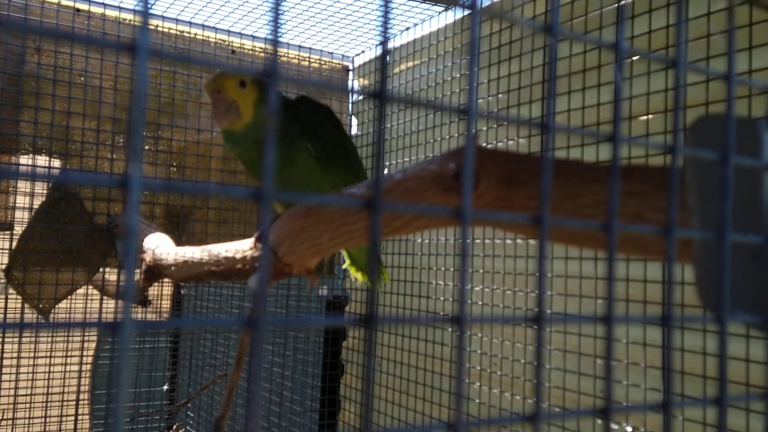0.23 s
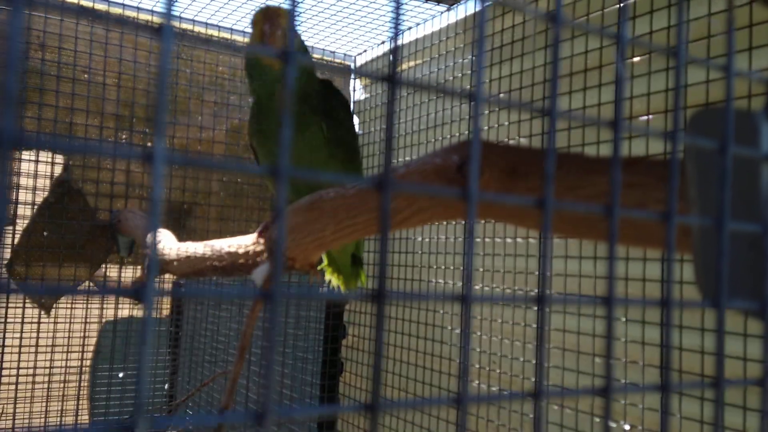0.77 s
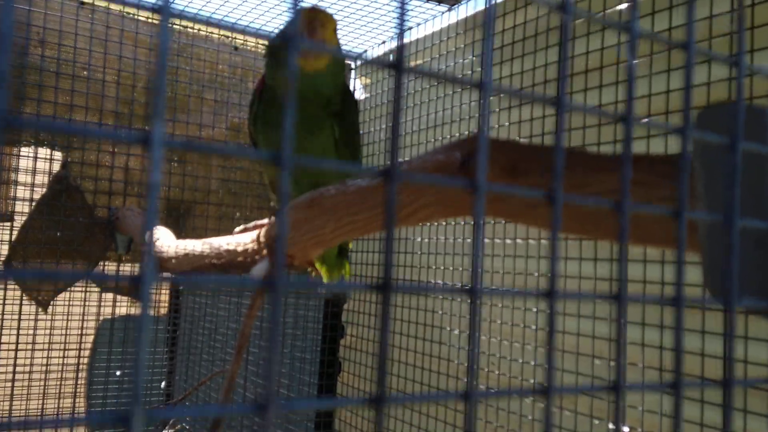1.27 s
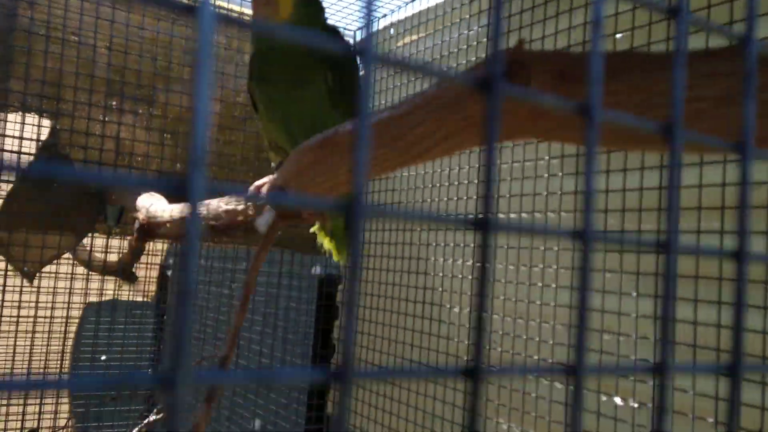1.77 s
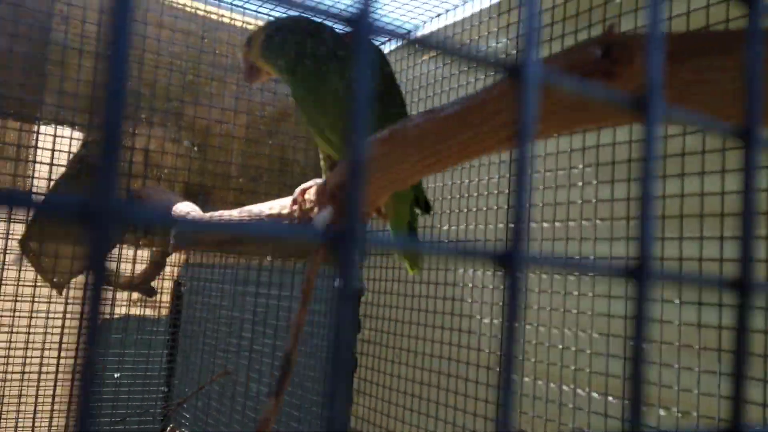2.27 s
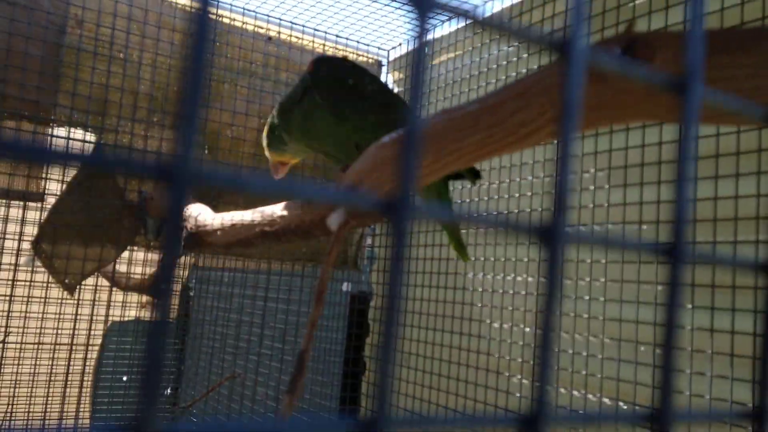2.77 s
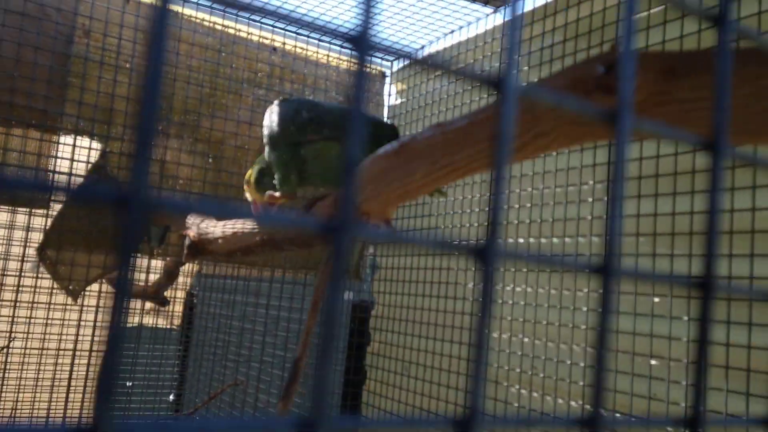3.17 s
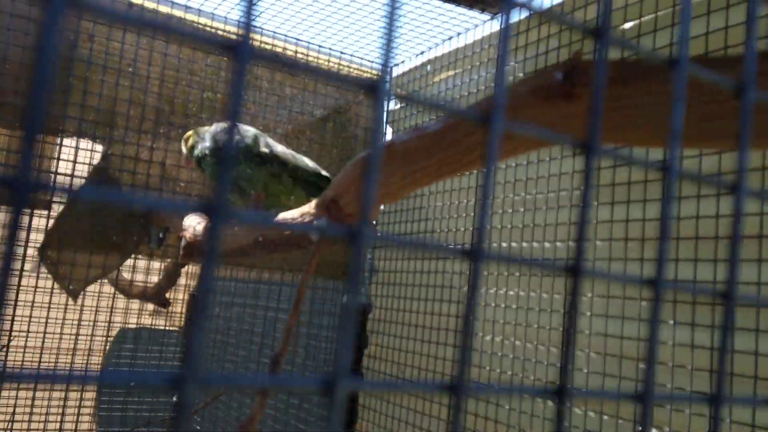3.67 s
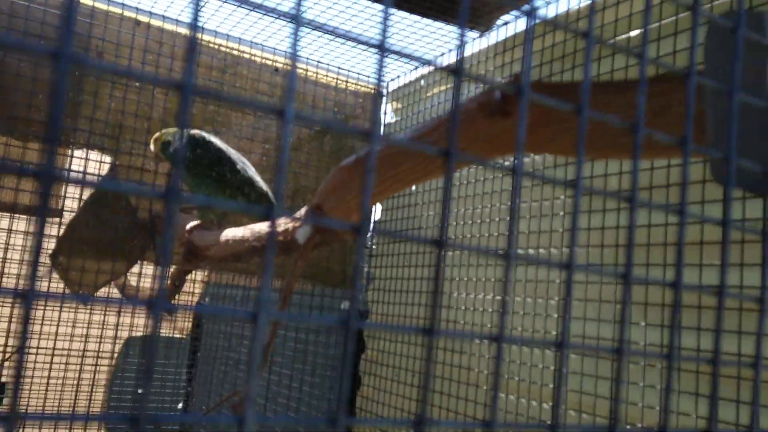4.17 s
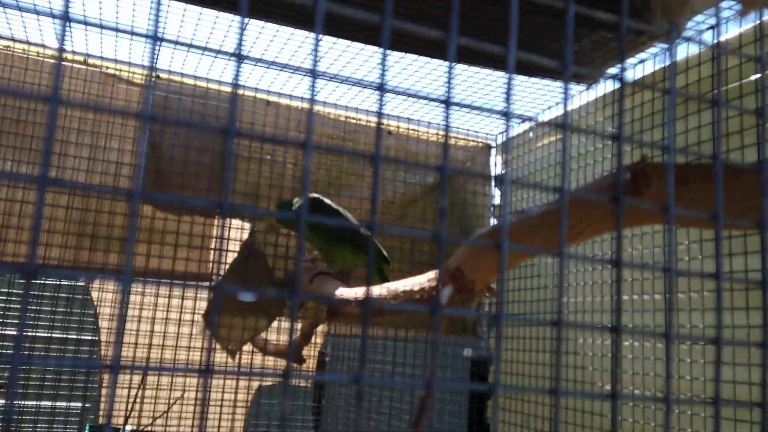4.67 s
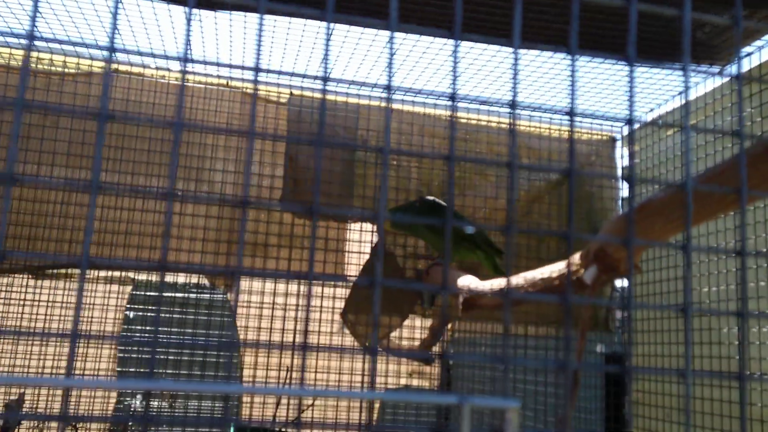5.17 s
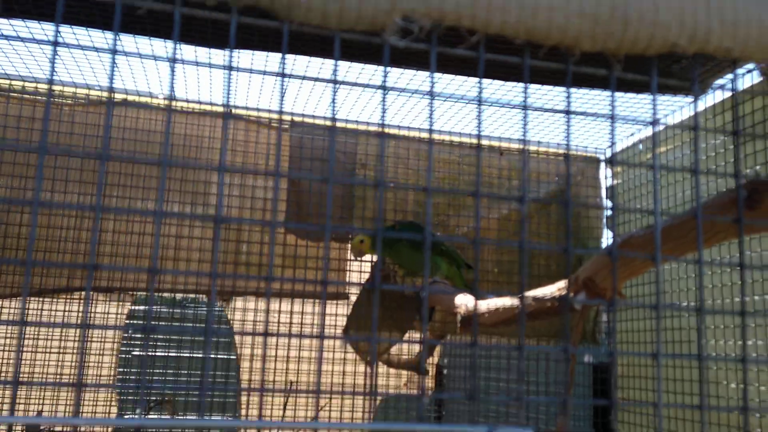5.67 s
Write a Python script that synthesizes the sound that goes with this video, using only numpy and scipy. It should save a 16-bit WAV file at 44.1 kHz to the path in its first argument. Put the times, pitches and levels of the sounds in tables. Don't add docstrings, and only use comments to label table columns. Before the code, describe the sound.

A parrot close by gnaws a wooden perch with sharp irregular cracks, dry ticks and short scrapes, then stops, leaving faint rustling and a feather shake.

```python
import sys
import numpy as np
from scipy import signal
from scipy.fft import rfft, irfft, next_fast_len
from scipy.io import wavfile
from scipy.ndimage import uniform_filter1d

SR = 44100
rng = np.random.default_rng(int(sys.argv[2]) if len(sys.argv) > 2 else 0)


def decibels_to_gain(level_db):
    exponent = np.asarray(level_db, float) / 20
    return 10 ** exponent


def generate_wav(signal):
    frames = np.transpose(np.atleast_2d(signal))
    scaled = np.clip(frames, -1, 1) * 32767
    pcm = np.round(scaled).astype(np.int16)
    wavfile.write(sys.argv[1], SR, pcm)


N = 260631
SPACING = 21
TURN_S = 2.0

# time in seconds, tick peak in dB, wood knock peak in dB,
# chip pitch in Hz, lead of the first touch in seconds.
SNAPS = [
    (0.2596, -26, -14, 2440, 0.009),
    (0.6299, -32.5, -25, 2570, 0.00086),
    (1.016, -19.5, -16.5, 2300, 0.009),
    (1.389, -16, -19, 2340, 0.00089),
    (1.787, -9, -7, 2470, 0.0096),
    (2.1838, -16, -8.5, 2880, 0.0067),
    (2.581, -10, -8, 2300, 0.0095),
    (2.9909, -21, -7, 2560, 0.0087),
    (3.4074, -11.5, -5.5, 2300, 0.012),
    (3.808, -8.5, -5.5, 1966, 0.0086),
]
# low thump in dB, high ring in dB.
HOLDS = [
    (-10.5, -4.5),
    (1.5, -3),
    (-3, 0.5),
    (-1, -5),
    (-3.5, -9),
    (-5, -1),
    (-1.5, 0.5),
    (-1, -1.5),
    (1.5, -5),
    (-2, -7.5),
]
# time in seconds, tick peak in dB, knock peak in dB, chip pitch in Hz.
KNOCKS = [(0.1655, -72, -43.5, 2730), (0.2157, -63, -40.5, 2780), (0.4336, -46, -36.5, 4950),
          (0.669, -18, -27, 3540), (.6705, -34, -35, 4800), (0.922, -61, -42, 3620),
          (2.277, -40, -27, 1980), (1.899, -25, -36, 2390), (0.544, -58, -46, 2600),
          (0.557, -50, -43, 3200), (0.6523, -60, -48, 2330), (0.193, -62, -58, 2250),
          (2.9298, -48, -30, 2300), (3.7319, -58.5, -42, 2400), (2.05, -23.5, -34, 3800),
          (2.091, -41, -34, 2130), (2.421, -20, -33.5, 3600), (2.484, -41, -32, 2300),
          (2.534, -45, -30, 2960), (2.8826, -51, -37, 2020), (2.999, -16.5, -20.5, 2520),
          (3.115, -28, -29.5, 2300), (3.245, -20.5, -27, 2300), (3.328, -34.5, -23, 1970),
          (3.5022, -20.5, -27, 2280), (3.6396, -19, -33.5, 3800), (3.6912, -38.5, -32.5, 2290),
          (3.694, -60, -30, 3100), (3.7546, -13, -17.5, 2600), (3.7714, -19, -26, 3400),
          (3.7964, -29, -49, 2400), (4.0822, -28, -39.5, 3700), (4.1172, -26.5, -37.5, 2400),
          (3.7997, -35, -28, 2390), (3.71, -55, -44, 2300), (4.1276, -29, -37, 2370),
          (4.1346, -42, -40, 2480), (4.14, -33, -41, 2410), (4.1858, -58, -42, 2720),
          (4.432, -43, -45, 2960), (4.9923, -44, -46, 2540)]
# time in seconds, peak in dB.
DRY_TICKS = [(.1016, -53), (.1273, -42), (.1306, -30.5), (.134, -36), (.4935, -46), (.5066, -35.5),
             (.5077, -23.5), (.5095, -21), (.5178, -38), (.5212, -37), (.5243, -29), (.5271, -37),
             (.5299, -50), (1.6178, -34), (2.0302, -19), (2.055, -26.5), (2.0587, -26), (2.1425, -38),
             (2.2018, -26), (2.2105, -40), (2.2148, -42), (2.2982, -28), (2.316, -46), (2.4228, -24),
             (2.4472, -19.5), (2.4525, -25), (2.4569, -23), (2.4609, -38), (2.541, -39), (2.5754, -45),
             (2.6047, -30), (2.6205, -32), (2.7226, -33), (2.8257, -18.5), (2.849, -27), (2.8537, -19),
             (2.8575, -37), (2.9863, -21), (3.222, -19.5), (3.2392, -23), (3.2496, -29), (3.2537, -25),
             (3.3907, -50), (3.6586, -18.5), (3.663, -19), (3.6673, -24.5), (3.6709, -49), (3.674, -27),
             (3.7576, -22), (3.8235, -28)]
# time in seconds, peak in dB.
GRIPS = [
    (0.2854, -19.5),
    (1.0455, -17.5),
    (1.4314, -20),
    (1.8195, -23),
    (2.2202, -19),
    (2.617, -21),
    (3.0156, -20),
    (3.8345, -21),
]
# time in seconds, peak in dB.
PINGS = [
    (.1132, -23.5),
    (0.8704, -19.5),
    (1.2461, -20),
    (1.6148, -14),
    (3.7545, -20),
]
# time in seconds, peak in dB.
FAR_TICKS = [(1.2965, -37), (1.2994, -34), (1.635, -28), (1.6638, -20.5), (2.7826, -41), (4.2988, -56),
             (4.3236, -40), (4.4441, -37), (4.73, -58), (5.34, -60.5), (5.7722, -53)]
# pitch in Hz, level in dB, 60 dB decay in seconds.
PERCH_MODES = [(263, -28.5, 0.055), (1076, -17, 0.013), (1426, -9, 0.0064), (2132, -4.5, 0.007),
               (3385, -15.5, 0.011), (4150, -12.5, 0.012), (4970, -12.5, 0.014), (6737, -11, 0.0067)]
# frequency in Hz, level in dB.
WOOD_TICK = [(1500, -39), (3000, -18), (4000, -10.5), (5600, -7), (7000, 1), (10000, 0.5), (14000, -11),
             (16500, -19)]
# frequency in Hz, level in dB.
HORN = [(1500, -56.5), (3000, -20), (4500, -7), (6000, -11.5), (7500, -1), (9500, 0), (12000, -9.5),
        (16500, -32)]
# frequency in Hz, level in dB.
PING = [(2500, -40), (4000, -17), (5800, -26), (7500, -6), (9500, 0), (11000, -5), (13000, -26),
        (16500, -28)]
# frequency in Hz, share of left-right dB.
SHADE_FACING = [(1000, 0.15), (2000, 0.18), (2800, 1), (4500, 0.74), (6500, 0.51), (9000, 1), (14000, 0.73)]
# frequency in Hz, share of left-right dB.
SHADE_TURNED = [(1000, .5), (2000, 0.57), (2800, 1.5), (4500, 0.9), (6500, .55), (9000, 1.5), (14000, 2.5)]
# bite in seconds, full pressure in seconds, lift in seconds,
# hiss in dB, rumble through the perch in dB.
RASPS = [
    (0.298, 0.327, 0.35, -31.5, -60),
    (0.678, 0.714, 0.72, -30, -57.5),
    (1.058, 1.086, 1.112, -32, -55.5),
    (1.446, 1.468, 1.515, -31.5, -60),
    (1.837, 1.856, 1.894, -26.5, -50),
    (2.234, 2.26, 2.296, -27, -49.5),
    (2.628, 2.66, 2.692, -29, -50),
    (3.031, 3.07, 3.086, -21.5, -41),
    (3.446, 3.486, 3.496, -24, -40.5),
    (3.846, 3.876, 3.89, -26, -45.5),
]
# frequency in Hz, level in dB.
GRAIN = [(800, -29.5), (1500, -22.5), (2200, -11.5), (3700, -13), (5600, -14), (6400, -4), (10000, 1.5),
         (12500, -6.5), (16000, -15.5)]
# frequency in Hz, level in dB.
TURNED_GRAIN = [(6000, 0), (9000, -2), (12000, 2.5), (16000, -0.5)]
# frequency in Hz, level in dB.
RUMBLE = [(45, -46), (68, -7), (130, -14.5), (300, -6.5), (900, -7.5), (1500, -13.5), (3000, -20.5)]
# frequency in Hz, level in dB.
FAR_EAR = [(200, -7.5), (1000, -8), (2500, -5.5), (4500, -14.5), (9000, -13.5), (15000, -65)]
# time in seconds, pitch in Hz, peak in dB, length in seconds.
BUMPS = [(1.385, 334, -40, 0.014), (1.412, 227, -40.5, 0.016), (1.488, 253, -31, 0.013),
         (1.512, 268, -42, 0.015), (1.547, 205, -39.5, 0.019), (2.696, 462, -45.5, 0.035),
         (2.783, 453, -50, 0.029), (2.811, 438, -36, 0.021), (2.814, 956, -43.5, 0.02),
         (2.828, 380, -37, .012), (2.84, 418, -37.5, 0.01)]
# peak time in seconds, peak in dB, rise in seconds, fall in seconds.
DRAGS = [
    (1.68, -40, 0.038, 0.22),
    (1.76, -43, 0.14, 0.031),
    (3.29, -43, 0.051, 0.15),
]
# frequency in Hz, level in dB.
CLAW = [(1000, -26), (1800, -6), (2500, -0.5), (2900, 0), (3300, -12), (4000, -30)]
# frequency in Hz, level in dB.
PLUMES = [(1500, -20), (3000, -10), (4500, -17), (6000, -5), (7000, -6.5), (8500, 4.5), (12500, -9),
          (13600, -18), (16000, -22)]
# time in seconds, peak in dB, left-right in dB.
CRACKS = [
    (1.546, -20, 3),
    (1.55, -8, 0.5),
    (1.5563, -17.5, 8),
]
# frequency in Hz, level in dB.
TWIG = [(1500, -17), (3000, -14), (5500, -41), (7000, -3), (9500, 6.5), (12000, -10), (16000, -18)]
# frequency in Hz, level in dB.
HOUSING = [(150, -11.5), (500, -1.5), (1000, 1.5), (3000, -5.5), (9000, -8), (15000, -30)]
# start in seconds, length in seconds, pitch in Hz, glide in Hz, level in dB.
CHIRPS = [(0.014, .052, 5740, 20, -75), (4.56, 0.075, 6230, 170, -79.5), (0, 0.013, 3580, 0, -68.5),
          (.006, .054, 2910, -70, -70), (.052, .052, 2930, 50, -67), (3.522, .028, 3400, 20, -71),
          (3.558, .062, 3470, 20, -73), (4.5, .11, 3830, 60, -76), (4.51, .03, 3660, -30, -76),
          (4.605, .035, 3000, -200, -77), (4.64, .16, 3150, -60, -84)]
# time in seconds, level in dB.
STIR = [(0, -62), (.9, -63), (1.2, -57.5), (1.52, -40.5), (1.62, -51), (1.83, -45), (2.0, -57.5),
        (2.24, -56), (2.4, -58.5), (2.85, -51), (3.02, -44.5), (3.12, -54), (3.38, -40.5), (3.57, -54.5),
        (3.735, -53), (3.84, -47.5), (4.05, -55), (5.91, -64)]
# peak time in seconds, peak in dB, rise in seconds, fall in seconds.
RUSTLES = [(.37, -52, 0.21, 0.13), (.76, -51, 0.15, 0.054), (1.1, -43, 0.1, 0.036), (1.5, -39, 0.45, 0.075),
           (1.57, -44, 0.047, 0.054), (1.69, -34.5, 0.078, 0.11), (1.83, -45.5, 0.25, 0.12),
           (2.22, -52, 0.11, 0.16), (2.44, -45, 0.06, 0.062), (2.7, -41.5, 0.04, 0.091),
           (2.836, -42, 0.08, 0.13), (3.02, -50, 0.099, 0.6), (3.3, -44.5, 0.055, 0.042),
           (3.905, -43, 0.1, 0.13), (4.1, -57.5, 0.053, 0.11), (4.36, -65.5, 0.13, 0.34),
           (5.01, -59.5, 0.26, 0.082), (5.15, -60, 0.02, 0.23)]
# peak time in seconds, peak in dB, rise in seconds, fall in seconds.
SCUFFLES = [
    (.29, -58.5, 0.028, 0.34),
    (.7, -61, 0.051, 0.35),
    (1.56, -73, 0.06, 0.049),
    (1.68, -41, 0.016, 0.14),
    (2.44, -51, 0.091, 0.14),
    (2.86, -49.5, 0.17, 0.39),
    (3.03, -50, 0.077, 0.68),
    (3.3, -34.5, 0.39, 0.23),
    (3.834, -44.5, 0.063, 0.15),
    (5.45, -54, 0.015, 0.2),
]
# frequency in Hz, level in dB.
FINE = [(1500, -26.5), (3500, -6.5), (5400, -5.5), (6500, -1), (8500, 3.5), (10500, -5), (13000, -15.5),
        (16000, -29.5)]
# frequency in Hz, level in dB.
COARSE = [(500, -9.5), (1000, 0.5), (2000, 3), (2800, -1.5), (3200, -6.5), (3800, -17), (5500, -15.5),
          (9000, -44.5)]
# frequency in Hz, level in dB.
WASH = [(60, -4), (160, -4), (220, -1.5), (450, -2.5), (680, 0), (1000, -4.5), (1500, -31.5), (2500, -39)]
# frequency in Hz, left-right likeness.
SAME = [(290, .72), (640, .05), (1400, -.25), (3100, -.08), (8000, .02)]
# frequency in Hz, left-right in dB.
LEAN = [(300, 3), (2000, -2.5), (4500, 4), (6300, -4.5), (9000, -1), (12000, 7)]
# time in seconds, level in dB.
DRONE = [
    (0.0, -71.5),
    (1.33, -70),
    (1.51, -65.5),
    (2.76, -71.5),
    (3.21, -62),
    (5.91, -75),
]
# frequency in Hz, level in dB.
BASS = [(20, -41.5), (40, -32), (62, 6.5), (80, 1.5), (100, 1.5), (125, 2.5), (200, -27)]
# frequency in Hz, level in dB.
MIC = [(15, -40), (45, -3), (80, 0), (15800, 0), (16050, -26), (16750, -30), (16850, -90)]


def contacts():
    rows = []
    for (s, tick_db, knock_db, chip_hz, lead), hold in zip(SNAPS, HOLDS):
        rows.append((s, tick_db, knock_db, chip_hz, 18, WOOD_TICK, *hold))
        rows.append((s - lead, knock_db - 26, knock_db - 15, 2980, 10, WOOD_TICK, -3, -6))
    for knock in KNOCKS:
        rows.append((*knock, 18, WOOD_TICK, 0, 0))
    dry_contacts = [(PINGS, 17.5, PING), (DRY_TICKS, 17.5, HORN), (GRIPS, 17.5, HORN), (FAR_TICKS, 7, HORN)]
    for events, pan_db, colour in dry_contacts:
        for s, db in events:
            rows.append((s, db, db - 30.5, 2300, pan_db, colour, 0, 0))
    return rows


def bites():
    out, t = np.zeros((2, N)), np.arange(2400) / SR
    for s, tick_db, knock_db, chip_hz, pan_db, colour, thump_db, ring_db in contacts():
        tick_t60 = 0.012 if colour is PING else 0.0015
        bite = peaked(beak_tick(t, colour, tick_t60), tick_db)
        knock = wood_knock(t, knock_db, chip_hz, thump_db, ring_db)
        add(bite, 0.0008, peaked(knock, knock_db))
        lag = np.clip(pan_db / 8, -1, 1) * SPACING / SR / 2
        shade = SHADE_FACING if s < TURN_S else SHADE_TURNED
        for ear, side in enumerate((1, -1)):
            away_db = min(side * pan_db, 0)
            shaded = coloured(bite, [(hz, away_db * share) for hz, share in shade])
            add(out[ear], s + abs(lag) - side * lag, shaded)
    return out


def beak_tick(t, colour, t60):
    decay = decibels_to_gain(-60 * t / t60) + decibels_to_gain(-15 - 60 * t / 0.014)
    return swept(coloured(rng.standard_normal(len(t)) * decay, colour))


def swept(x):
    hz = np.fft.rfftfreq(len(x), 1 / SR)
    late = 0.002 * (4000 / np.maximum(hz, 3500)) ** 2.4
    phase = 2 * np.pi * np.cumsum(late) * hz[1]
    return irfft(rfft(x) * np.exp(-1j * phase), len(x))


def wood_knock(t, knock_db, chip_hz, thump_db, ring_db):
    hz, db, t60 = np.array(PERCH_MODES).T[:, :, None]
    level_spread, pitch_spread = rng.standard_normal((2, len(PERCH_MODES), 1))
    hold_db = thump_db * (hz < 500) + ring_db * ((hz > 3000) & (hz < 5800))
    decay = decibels_to_gain(db + hold_db + 1.5 * level_spread - 60 * t / t60)
    perch = decay * np.sin(2 * np.pi * hz * (1 + 0.025 * pitch_spread) * t)
    reach_db = np.clip(0.23 * (knock_db - 2.0), -14, 0)
    chip = decibels_to_gain(-60 * t / 0.005) * np.sin(2 * np.pi * chip_hz * t)
    knock = (chip + decibels_to_gain(reach_db) * perch.sum(0)) * np.minimum(t / 0.0011, 1)
    bounce = np.r_[np.zeros(130), knock[:-130]]
    return knock + 0.14 * bounce


def rasps():
    t, near = np.arange(N) / SR, np.zeros(N)
    sizes = decibels_to_gain(1.1 * np.minimum(rng.exponential(1, N), 4))
    snaps = sizes * (rng.random(N) < 15000 / SR)
    fibres = signal.lfilter([1], [1, -0.92], snaps) * rng.standard_normal(N)
    hiss = evened(coloured(fibres, GRAIN))
    hiss = np.where(t < TURN_S, hiss, coloured(hiss, TURNED_GRAIN))
    rumble = evened(coloured(rng.standard_normal(N), RUMBLE))
    for bite, full, lift, hiss_db, rumble_db in RASPS:
        s = [bite - 0.009, bite, full, lift, lift + 0.008, lift + 0.008 + 0.03]
        press_db = np.interp(t, s, [-24, -6, 0, -3.5, -17, -30])
        stroke = np.clip(np.minimum(t - s[0], s[-1] - t) / 0.005, 0, 1)
        near += stroke * hiss * decibels_to_gain(hiss_db + press_db + 2.0)
        near += stroke * rumble * decibels_to_gain(rumble_db + 0.59 * press_db + 8.0)
    scatter = rng.standard_normal(300) * decibels_to_gain(-60 * np.arange(300) / SR / 0.025)
    paths = np.r_[np.zeros(SPACING), 0.5, scatter / np.linalg.norm(scatter)]
    far = np.convolve(near, paths)[:N]
    return np.array([near, coloured(far, FAR_EAR)])


def aviary(x):
    at = np.arange(150, 9000, 20) + rng.integers(0, 20, (2, 443))
    echoes = rng.choice([-1., 1.], at.shape) * decibels_to_gain(-60 * at / SR / 0.049)
    taps = np.zeros((2, 9030))
    np.put_along_axis(taps, at, echoes, axis=1)
    taps = coloured(taps, [(3000, 0.5), (9000, -12.0), (15000, -10.5)])
    return signal.fftconvolve(x[None], taps / np.linalg.norm(taps[0]), axes=1)[:, :N]


def perch_bumps():
    out = np.zeros((2, N))
    for s, hz, db, length in BUMPS:
        t = np.arange(0, length, 1 / SR)
        waver = evened(uniform_filter1d(rng.standard_normal(len(t)), size=200))
        phase = 2 * np.pi * np.cumsum(hz * (1 + 0.08 * waver)) / SR
        bump = decibels_to_gain(db) * np.sin(phase) * np.hanning(len(t))
        add(out[0], s, bump)
        add(out[1], s, bump * decibels_to_gain(-5.0))
    return out


def claw():
    return swells(DRAGS, -90) * diffuse(CLAW, (2000, 3200), patchy_db=2.5, grit_db=1.5)


def feathers():
    t, start = np.arange(N) / SR, 5.428
    s = np.cumsum([start, 0.0055, 0.095, 0.053, 0.29])
    level_db = -35.5 + np.interp(t, s, [-40, 0, -3, -14.5, -58])
    noise = diffuse(PLUMES, (6000, 11000), patchy_db=1.2, grit_db=1.1)
    return decibels_to_gain(level_db) * (t > start) * noise


def twig():
    out, t = np.zeros((2, N)), np.arange(3000) / SR
    envelope = np.minimum(t / 0.00058, 1) * (decibels_to_gain(-60 * t / 0.006) + decibels_to_gain(-17 - 60 * t / 0.09))
    for s, db, pan_db in CRACKS:
        for ear, side in enumerate((1, -1)):
            burst = coloured(rng.standard_normal(len(t)) * envelope, TWIG)
            add(out[ear], s, peaked(burst, db + min(side * pan_db, 0)))
    return out


def tap():
    out = np.zeros((2, N))
    out[1, round(4.4034 * SR)] = -decibels_to_gain(-46)
    out[1, round(4.4044 * SR)] = decibels_to_gain(-4.5)
    return coloured(out, HOUSING)


def chirps():
    out = np.zeros(N)
    for s, length, hz, glide_hz, db in CHIRPS:
        t = np.arange(0, length, 1 / SR)
        flutter, waver = [drift(len(t)) for _ in range(2)]
        pitch = hz + glide_hz * t / length + 0.006 * hz * waver
        tone = np.sin(2 * np.pi * np.cumsum(pitch) / SR)
        level = 2 * decibels_to_gain(db + 1.5 * t / length + 3.0 * flutter)
        add(out, s, level * tone * signal.windows.tukey(len(t), 0.25))
    return out * decibels_to_gain(np.array([[-3], [2.5]])) + decibels_to_gain(-7) * aviary(out)


def drift(n):
    smooth = uniform_filter1d(rng.standard_normal(n), size=150)
    return evened(uniform_filter1d(smooth, size=150))


def surroundings():
    stir_db = np.interp(np.arange(N) / SR, *np.transpose(STIR))
    above_calm_db = stir_db + 60
    fine = swells(RUSTLES, -61 + 0.5 * above_calm_db)
    coarse = swells(SCUFFLES, -59.5 + 0.8 * above_calm_db)
    rustle = fine * diffuse(FINE, (6000, 11000), patchy_db=1.2, grit_db=1.5)
    scuffle = coarse * diffuse(COARSE, (1200, 3200), patchy_db=1.5, grit_db=1.2)
    wash = decibels_to_gain(stir_db) * diffuse(WASH, (150, 900), patchy_db=2.0, grit_db=1.82)
    return rustle + scuffle + wash


def drone():
    s, db = np.transpose(DRONE)
    common, left, right = rng.standard_normal((3, N))
    noise = coloured(common + 0.17 * np.array([left, right]), BASS)
    return decibels_to_gain(np.interp(np.arange(N) / SR, s, db)) * evened(noise)


def swells(rows, rest_db):
    t, level = np.arange(N) / SR, decibels_to_gain(rest_db)
    for s, db, rise, fall in rows:
        level = level + decibels_to_gain(db - 20 * np.maximum((s - t) / rise, (t - s) / fall))
    return level


def diffuse(spectrum, band, patchy_db, grit_db):
    frames, hz = N // 128 + 5, np.fft.rfftfreq(512, 1 / SR)
    a, b, c, d, patches = rng.standard_normal((frames, 257, 5)).T
    patches = uniform_filter1d(patches, size=8, axis=0)
    patches = evened(uniform_filter1d(patches, size=14, axis=1))
    same = np.clip(read(SAME, hz), -1, 1)[:, None]
    left = a + 1j * b
    z = np.array([left, same * left + np.sqrt(1 - same ** 2) * (c + 1j * d)])
    lean = read(LEAN, hz)
    balance_db = np.array([lean, 0 * lean])[:, :, None]
    z *= decibels_to_gain(read(spectrum, hz)[:, None] + balance_db + patchy_db * patches)
    inside = (hz > band[0]) & (hz < band[1])
    z /= np.sqrt(np.mean(abs(z[1, inside]) ** 2) * (band[1] - band[0]))
    x = signal.istft(z, nperseg=512, noverlap=384)[1][:, :N] * np.sqrt(SR / 768)
    grit = evened(uniform_filter1d(rng.exponential(1, N) ** 2, size=60) - 2)
    return x * decibels_to_gain(grit_db * grit)


def evened(x):
    return x / np.sqrt(np.mean(x ** 2) + 1e-20)


def peaked(x, db):
    return decibels_to_gain(db) * x / abs(x).max()


def read(points, hz):
    f, value = np.transpose(points)
    return np.interp(np.log(hz + 1), np.log(f + 1), value)


def coloured(x, spectrum):
    n = x.shape[-1]
    size = next_fast_len(n + 512)
    gain = decibels_to_gain(read(spectrum, np.fft.rfftfreq(size, 1 / SR)))
    return irfft(rfft(x, size) * gain, size)[..., :n]


def add(mix, s, sound):
    part = mix[max(round(s * SR), 0):][:len(sound)]
    part += sound[:len(part)]


def scene():
    beak = bites() + rasps()
    bird = beak + decibels_to_gain(-20.5) * aviary(beak[0]) + perch_bumps() + claw() + feathers()
    return bird + twig() + tap() + chirps() + surroundings() + drone()


def low_pass(x):
    return signal.sosfilt(signal.butter(12, 16970, fs=SR, output="sos"), x)


def record(dry):
    heard = coloured(dry, MIC)
    return low_pass(heard)


dry = scene()
out = record(dry)
generate_wav(out)
```